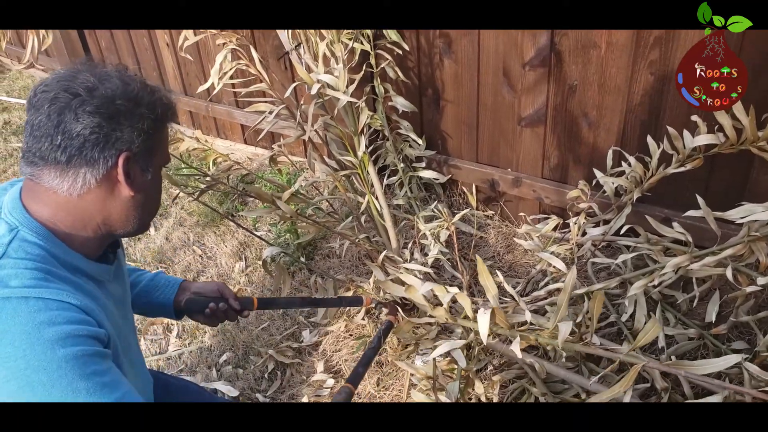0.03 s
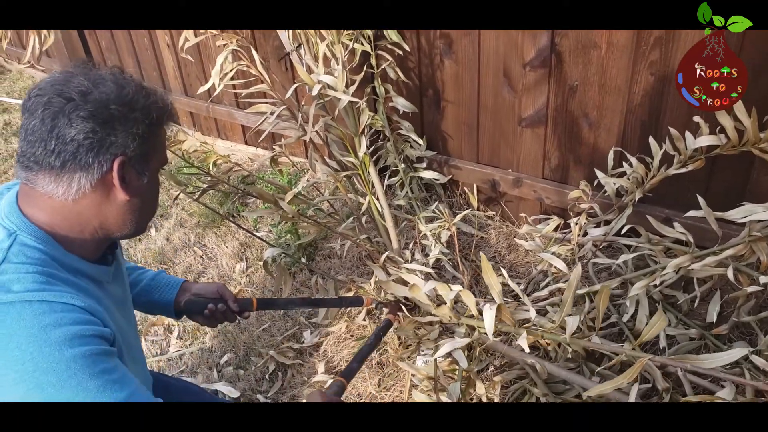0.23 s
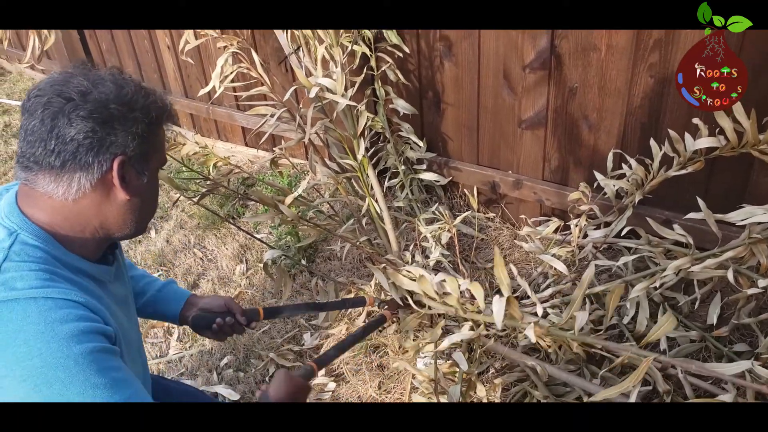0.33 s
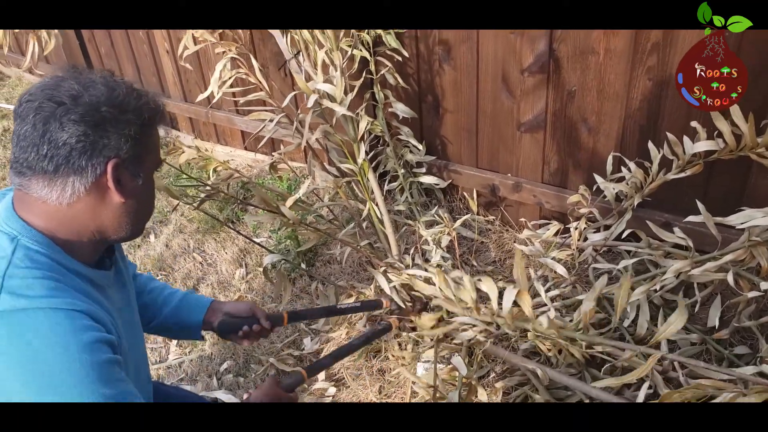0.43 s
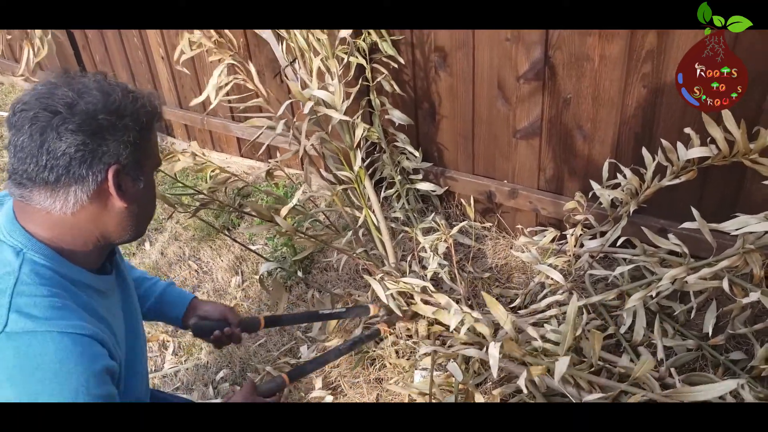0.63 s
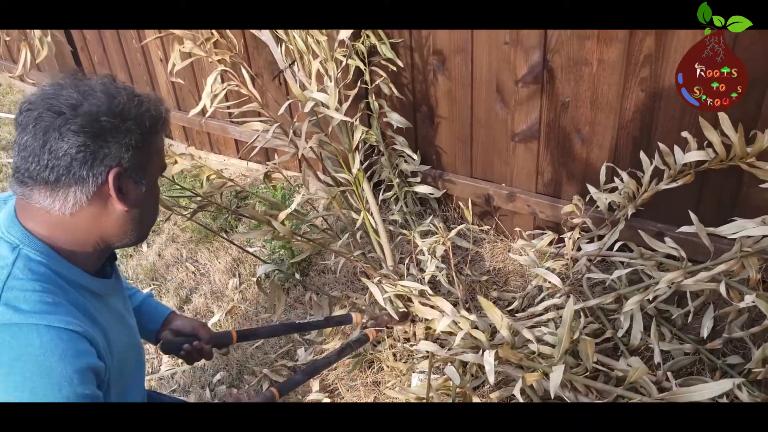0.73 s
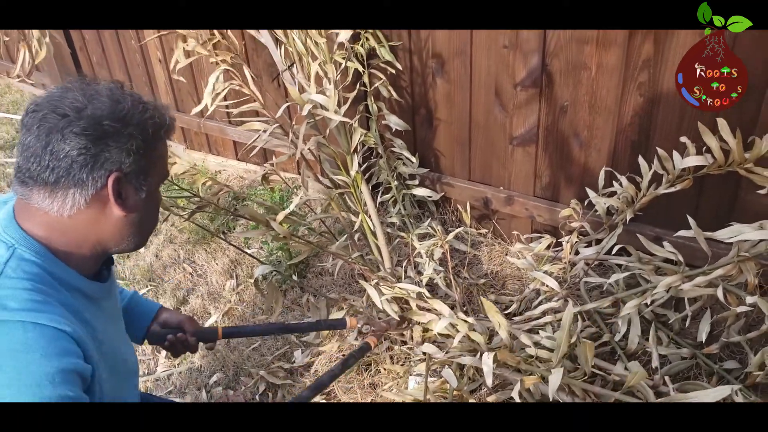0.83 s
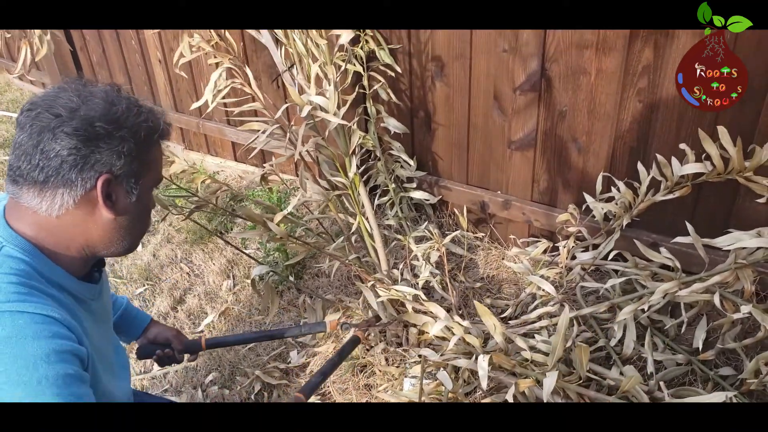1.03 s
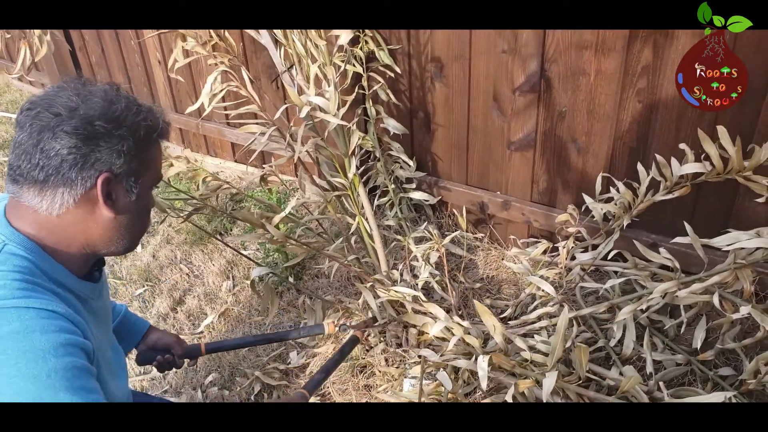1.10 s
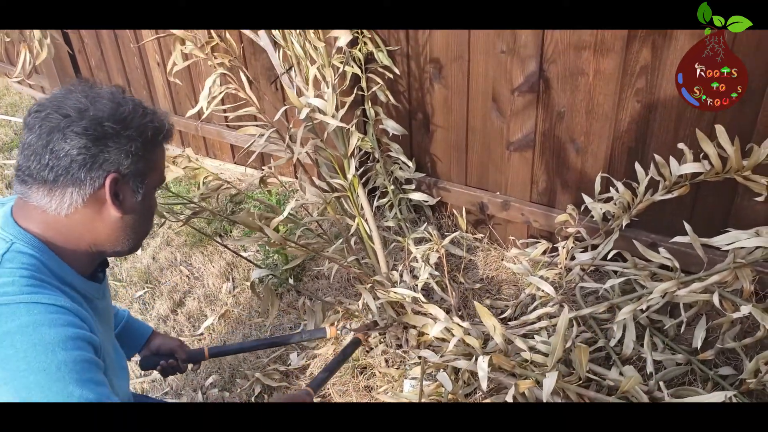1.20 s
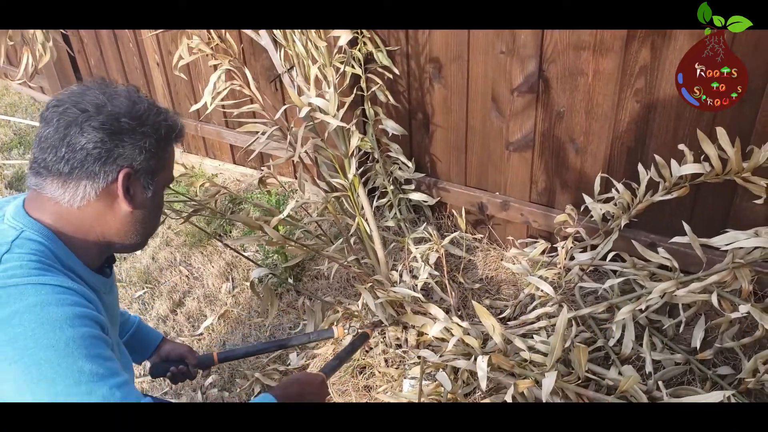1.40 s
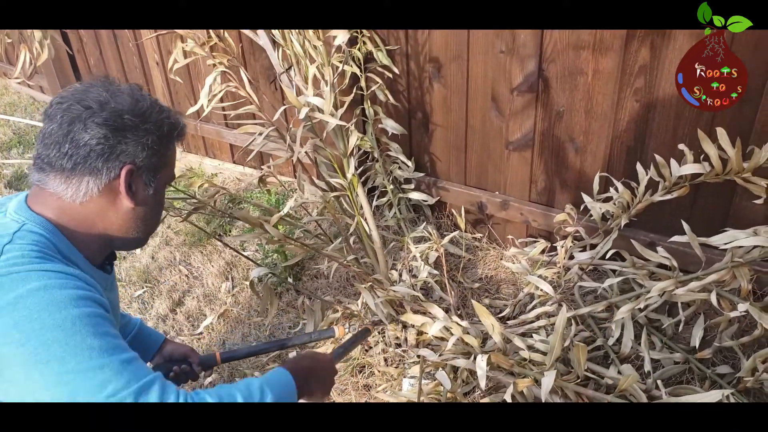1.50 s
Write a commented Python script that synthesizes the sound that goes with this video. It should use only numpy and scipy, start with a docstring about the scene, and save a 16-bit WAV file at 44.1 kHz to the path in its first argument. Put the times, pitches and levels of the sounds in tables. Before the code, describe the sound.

Loppers snap through a dry branch, then dry leaves rustle and settle.

```python
"""Long-handled loppers bite through a dry branch: a few fibres give, then the wood snaps in a volley.
Each fracture tears fibres, knocks the wood and rings branch and blades; ground and yard fence scatter it.
The branch sinks into a heap of dry leaves, which rustle, flick and settle.
Air rumbles and twice thumps on the microphone, over a faint wash of distant traffic."""
import sys
import numpy as np
from scipy import signal
from scipy.fft import rfft, irfft
from scipy.io import wavfile
from scipy.ndimage import uniform_filter1d

SR = 44100
rng = np.random.default_rng(int(sys.argv[2]) if len(sys.argv) > 2 else 0)


def transcribe(signal):
    """Save signal, clipped to [-1, 1], as a 16-bit WAV file at the path in sys.argv[1]."""
    frames = np.atleast_2d(signal).T
    limited = np.clip(frames, -1, 1)
    pcm = np.round(limited * 32767).astype(np.int16)
    wavfile.write(sys.argv[1], SR, pcm)


N = 68355

# Distant traffic. Each row: frequency in Hz, relative density in dB.
TRAFFIC_SPECTRUM = [(60, 6.5), (140, 11), (250, -1), (420, -3), (620, -5), (850, 1.5), (1030, 3.5),
                    (1300, -2), (2000, -8), (3500, -16), (7000, -28), (15000, -48)]
# Level of the background wash, dipping slightly after the snap. Each row: time in seconds, level in dB.
WASH_LEVEL = [(0, -44), (.33, -42.5), (1.05, -46), (1.55, -46)]
# Air on the microphone. Each row: frequency in Hz, relative density in dB.
RUMBLE_SPECTRUM = [(20, -42), (32, -8.5), (48, -4.5), (62, 5.5), (80, -6.5), (110, -17), (145, -16),
                   (200, -37), (320, -37), (700, -80)]
# Rumble loudness. Each row: time in seconds, level in dB.
RUMBLE_LEVEL = [(0, -37), (.08, -34.5), (.115, -41), (.15, -26.5), (.2, -48.5), (.228, -27.5), (.28, -31.5),
                (.32, -37), (.38, -39), (.42, -28), (.48, -24.5), (.512, -39.5), (.548, -27), (.65, -39.5),
                (.735, -30), (.865, -37), (.895, -26), (1.05, -28.5), (1.17, -36), (1.22, -26.5),
                (1.3, -24.5), (1.4, -44.5), (1.5, -36.5), (1.55, -36.5)]
# Air buffets. Each row: start in seconds, level in dB, pitch in Hz, decay in seconds.
BUFFETS = [(1.058, -17.5, 90.3, 0.029), (1.093, -7.5, 126, 0.0061), (1.108, -9.5, 60.7, 0.016),
           (1.233, -7, 103.5, 0.0073), (1.237, -8.5, 58, 0.01)]
# Stirring of the leaves. Each row: time in seconds, level in dB.
STIR_LEVEL = [(0, -53.5), (.078, -46), (.11, -51), (.14, -48.5), (.157, -41), (.235, -45.5), (.296, -53),
              (.364, -46), (.374, -37), (.398, -33), (.412, -33.5), (.424, -38), (.46, -30.5), (.495, -33),
              (.517, -37.5), (.548, -34.5), (.61, -33.5), (.665, -33), (.738, -39), (.798, -44),
              (.842, -42), (.865, -48), (.93, -49), (1.02, -48.5), (1.12, -55.5), (1.25, -60.5),
              (1.41, -64.5), (1.422, -50), (1.55, -51.5)]
# Gentle rustle. Each row: frequency in Hz, relative gain in dB.
GENTLE_SPECTRUM = [(120, -2), (350, 1), (700, 0), (1600, -2.5), (3100, -2), (4000, -1.5), (5800, -1.5),
                   (7500, -11), (11500, -14), (15600, -20.5), (16100, -50)]
# Brisk rustle. Each row: frequency in Hz, relative gain in dB.
BRISK_SPECTRUM = [(120, -21), (350, -4), (700, -4.5), (1600, -2), (3100, 0), (4000, -1.5), (6200, -1),
                  (8800, -9.5), (11500, -10), (15600, -19), (16100, -58)]
# Flicking twigs and leaves. Each row: start in seconds, level in dB, decay in seconds, centre in Hz.
TWIG_FLICKS = [(.074, -45, 0.0045, 5000), (0.209, -39, 0.004, 9000), (0.547, -36, 0.0032, 4000),
               (0.5998, -27, 0.0084, 3940), (.665, -30, .002, 4000), (.769, -34.5, 0.0036, 7000),
               (0.807, -44, .003, 3500), (.8335, -35, 0.0028, 10000), (0.892, -50, .002, 5000),
               (1.029, -42.5, 0.0023, 8500), (1.242, -47.5, 0.0024, 5000), (1.31, -55, 0.0033, 8000),
               (1.42, -52, 0.0036, 2800)]
# Scatter off ground and fence. Each row: frequency in Hz, T60 in seconds.
YARD_T60 = [(200, 0.1), (800, 0.075), (2500, 0.093), (7000, 0.21), (16000, 0.21)]
# Tearing fibres. Each row: frequency in Hz, relative gain in dB.
TEAR_SPECTRUM = [(200, -8.5), (1200, -5.5), (3300, 0.5), (5000, -3), (6700, 2.5), (9000, -8), (13000, -11),
                 (16500, -21)]
# Modes of branch and blades. Each row: frequency in Hz, relative level in dB, T60 in seconds.
BRANCH_MODES = [(345, -17.5, 0.032), (468, -3.5, 0.04), (813, -4, 0.042), (857, -4, 0.045),
                (1217, -4.5, 0.062), (1363, -8.5, 0.043), (1622, -5, .033), (1821, -2.5, 0.044),
                (1884, -11.5, 0.054), (2050, -17, 0.066), (2210, -9.5, 0.075), (2970, -8, 0.06),
                (3370, -9.5, 0.048), (6820, -18, 0.064)]
# Wood fractures. Each row: start in seconds, tear level in dB, tear decay in seconds,
# tear low-pass corner in Hz, knock level in dB, knock pitch in Hz, ring level in dB.
FRACTURES = [(0.3995, -30, 0.005, 2500.0, -11.5, 2800, -36), (0.4081, -23, 0.0047, 2200.0, -10, 2720, -28),
             (0.4229, -28.5, 0.014, 900.0, -33, 1880.0, -31.5),
             (0.4346, -25, 0.0015, 1200.0, -13, 1130, -29.5),
             (0.4364, -9, 0.0027, 14000.0, -12, 3530, -28.5), (0.44022, -15, 0.0017, 1500.0, -10, 388, -32),
             (0.4417, -8, 0.00096, 14000.0, -10.5, 854, -12.5),
             (0.444, -19, 0.0037, 4000.0, 1.5, 3370.0, -23),
             (0.4449, -17, 0.0031, 3000.0, -4.5, 1298, -18.5),
             (0.44745, -24, 0.0035, 7000.0, -15, 880, -22.5), (0.4503, -27, 0.003, 1200.0, -22, 307, -27),
             (0.45708, -17.5, 0.003, 2500.0, -10, 2290, -23.5),
             (0.4586, -21, 0.0048, 4000.0, -4, 1935, -19.5), (0.4632, -26, 0.0034, 900.0, -15, 580, -45),
             (0.46618, -44, 0.0027, 900.0, -17.5, 745, -33)]

GRAINS_PER_S, GRAIN_SPREAD_DB = 7000, 3


def amp(db):
    """Decibels to gain."""
    return 10 ** (np.asarray(db) / 20)


def unit(x):
    """Scales to rms 1."""
    return x / np.sqrt(np.mean(x ** 2) + 1e-20)


def at_hz(points, hz):
    """Interpolates a table over log frequency."""
    table_hz, value = np.transpose(points)
    return np.interp(np.log(hz + 1), np.log(table_hz + 1), value)


def curve(points):
    """Interpolates a time table at every sample."""
    return np.interp(np.arange(N) / SR, *np.transpose(points))


def add(mix, start_s, sound):
    """Mixes a sound in at start_s."""
    part = mix[max(round(start_s * SR), 0):][:len(sound)]
    part += sound[:len(part)]


def high_pass(x, hz, order=2):
    """Butterworth high-pass."""
    return signal.sosfilt(signal.butter(order, hz, "highpass", fs=SR, output="sos"), x)


def colour(x, spectrum, size=2048):
    """Minimum-phase filter of unit energy."""
    log_gain = np.log(amp(at_hz(spectrum, abs(np.fft.fftfreq(size, 1 / SR)))))
    response = np.exp(np.conj(signal.hilbert(log_gain)))
    taps = np.fft.ifft(response).real[:size // 2]
    return signal.fftconvolve(x, taps / np.linalg.norm(taps))[:len(x)]


def noise(spectrum):
    """Steady coloured noise, rms 1."""
    gain = amp(at_hz(spectrum, np.fft.rfftfreq(N, 1 / SR)))
    return unit(irfft(rfft(rng.standard_normal(N)) * gain, N))


def clicks(count, per_s, spread_db):
    """Random clicks; a spread above 0 dB makes a few stand out."""
    size = amp(spread_db * np.minimum(rng.exponential(1, count), 5))
    return unit(size * rng.choice([-1, 1], count) * (rng.random(count) < per_s / SR))


def burst(x, decay_s):
    """Exponential fade, with the energy of a burst starting at rms 1."""
    fade = np.exp(-np.arange(len(x)) / SR / decay_s)
    return unit(x * fade) * np.sqrt(np.mean(fade ** 2))


def damped_sine(t, hz, rise_s, decay_s):
    """Sine with exponential rise and decay."""
    return np.sin(2 * np.pi * hz * t) * (1 - np.exp(-t / rise_s)) * np.exp(-t / decay_s)


def flicker(x, depth_db, size=256):
    """Random gain in small time-frequency patches."""
    frames = signal.stft(x, nperseg=size)[2]
    patches = uniform_filter1d(rng.standard_normal(frames.shape), size=5, axis=0)
    patches = uniform_filter1d(patches, size=4, axis=1)
    return signal.istft(frames * amp(depth_db * unit(patches)), nperseg=size)[1][:len(x)]


def traffic():
    """Distant traffic blends into a faint wash."""
    return amp(curve(WASH_LEVEL)) * noise(TRAFFIC_SPECTRUM)


def air(evenness=0.6, rise_s=0.0016, buffet_top_hz=242):
    """Air on the microphone: low rumble and heavier, rounded buffets."""
    rumble = noise(RUMBLE_SPECTRUM)
    swell = np.sqrt(uniform_filter1d(rumble ** 2, size=2200) + 1e-9)
    rumble = amp(curve(RUMBLE_LEVEL)) * unit(rumble / swell ** evenness)
    buffets, t = np.zeros(N), np.arange(9000) / SR
    for start_s, db, hz, decay_s in BUFFETS:
        add(buffets, start_s, amp(db) * damped_sine(t, hz, rise_s, decay_s))
    buffets = signal.sosfiltfilt(signal.butter(2, buffet_top_hz, fs=SR, output="sos"), buffets)
    return high_pass(rumble + buffets, hz=27)


def leaves(rub_share=0.42, gentle_db=-55, brisk_db=-34):
    """Dry leaves tick and rub together, brighter the harder they are stirred."""
    ticks = np.sqrt(1 - rub_share) * clicks(N, GRAINS_PER_S, GRAIN_SPREAD_DB)
    rub = np.sqrt(rub_share) * rng.standard_normal(N)
    grains = unit(flicker(ticks + rub, depth_db=2.22))
    level_db = curve(STIR_LEVEL)
    briskness = np.clip((level_db - gentle_db) / (brisk_db - gentle_db), 0, 1)
    brisk, gentle = colour(grains, BRISK_SPECTRUM), colour(grains, GENTLE_SPECTRUM)
    return amp(level_db) * (briskness * brisk + (1 - briskness) * gentle)


def twigs(half_width_oct=1.56):
    """Single twigs and leaves slip free with a short crackle."""
    out, hz = np.zeros(N), np.geomspace(100, SR / 2, num=24)
    for start_s, db, decay_s, centre_hz in TWIG_FLICKS:
        band_db = np.maximum(-6 * (np.log2(hz / centre_hz) / half_width_oct) ** 2, -50)
        crackle = colour(clicks(2048, GRAINS_PER_S, GRAIN_SPREAD_DB), BRISK_SPECTRUM)
        crackle = colour(crackle, np.column_stack([hz, band_db]))
        add(out, start_s, amp(db) * burst(crackle, decay_s))
    return out


def yard(direct, scatter_db=-17, delay_s=0.005, size=128):
    """Direct sound plus short scatter off ground and fence."""
    hz, t, frames = signal.stft(rng.standard_normal(12000), SR, nperseg=size)
    fade = amp(-60 * t / at_hz(YARD_T60, hz)[:, None])
    tail = signal.istft(frames * fade, SR, nperseg=size)[1]
    scatter = np.zeros(N)
    add(scatter, delay_s, signal.fftconvolve(direct, tail / np.linalg.norm(tail)))
    return direct + amp(scatter_db) * scatter


def fibre_tear(count, decay_s, corner_hz, first_fibre_db=-15):
    """One fibre parts sharply, then the bundle behind it tears."""
    bundle = burst(clicks(count, per_s=9000, spread_db=0), decay_s)
    strength = np.linalg.norm(bundle)
    bundle[0] -= amp(first_fibre_db) * strength
    pole = np.exp(-2 * np.pi * corner_hz / SR)
    tear = signal.lfilter([1], [1, -pole], colour(bundle, TEAR_SPECTRUM))
    return strength * tear / np.linalg.norm(tear)


def branch(rise_s=0.00013, knock_decay_cycles=2.13):
    """Each fracture tears fibres, knocks the wood and rings branch and blades."""
    out, t = np.zeros(N), np.arange(6000) / SR
    ring = sum(amp(db) * damped_sine(t, hz, rise_s, t60_s / np.log(1000))
               for hz, db, t60_s in BRANCH_MODES)
    for start_s, tear_db, tear_decay_s, corner_hz, knock_db, knock_hz, ring_db in FRACTURES:
        tear = fibre_tear(len(t), tear_decay_s, corner_hz)
        knock = damped_sine(t, knock_hz, rise_s, knock_decay_cycles / knock_hz)
        add(out, start_s, amp(tear_db) * tear + amp(knock_db) * knock + amp(ring_db) * ring)
    return high_pass(out, hz=260, order=5)


def scene():
    """Mono mix: branch and twigs in the yard, leaves, traffic, air."""
    return (yard(branch() + twigs()) + leaves() + traffic() + air())[None]


def record(dry):
    """Soft peak limit, then low-pass."""
    ceiling, cutoff_hz = 1.1, 16600
    limited = dry / (1 + (dry / ceiling) ** 6) ** (1 / 6)
    taps = signal.firwin(401, cutoff_hz, window=("kaiser", 9), fs=SR)
    return signal.oaconvolve(limited, taps[None], "same")


dry = scene()
out = record(dry)
transcribe(out)
```